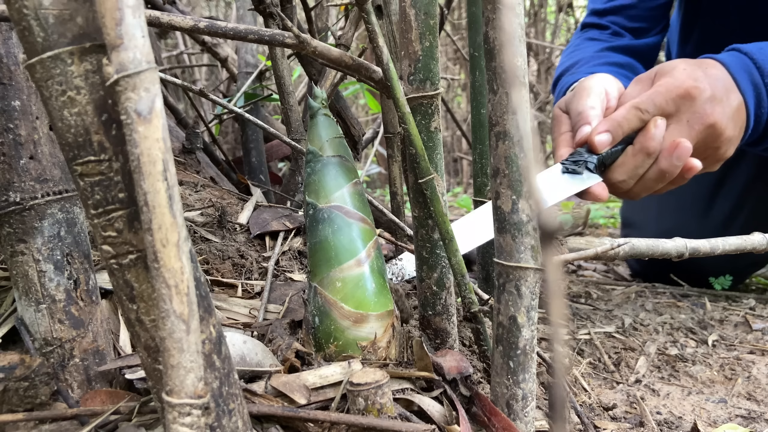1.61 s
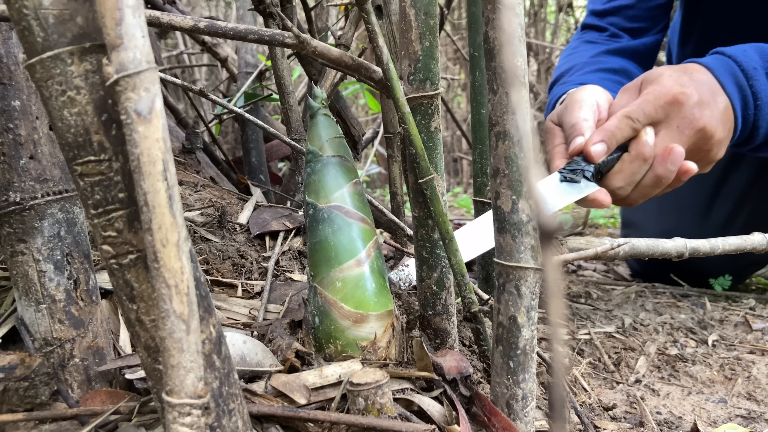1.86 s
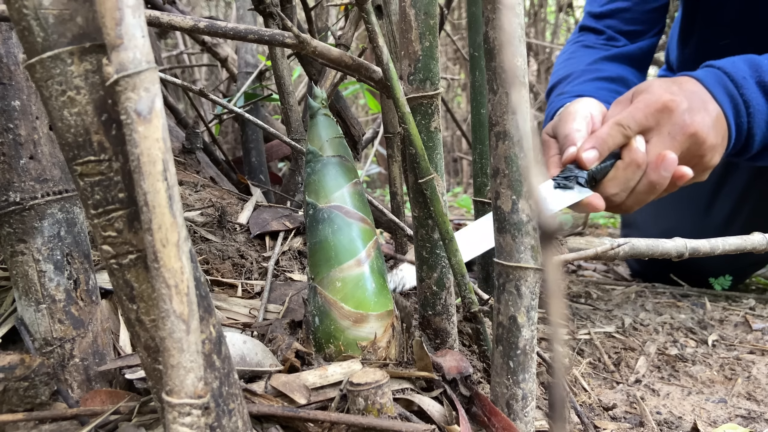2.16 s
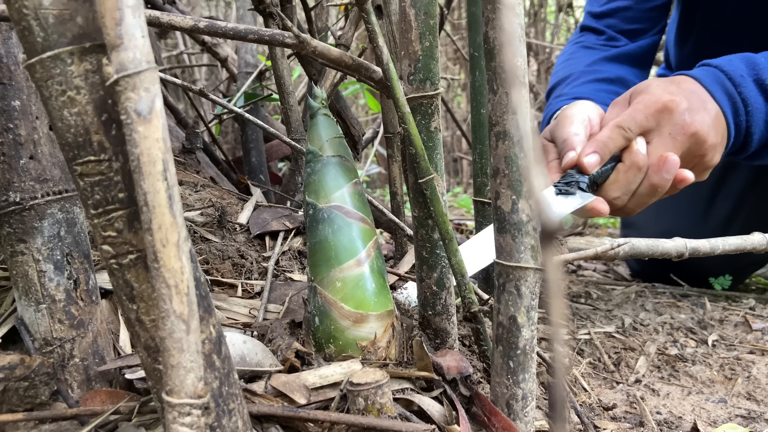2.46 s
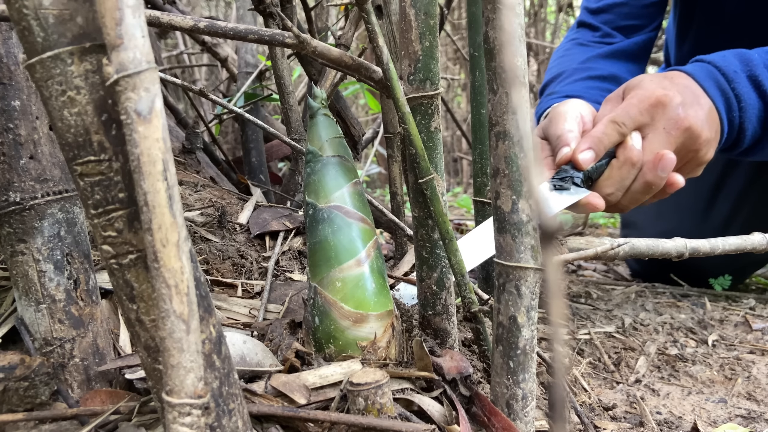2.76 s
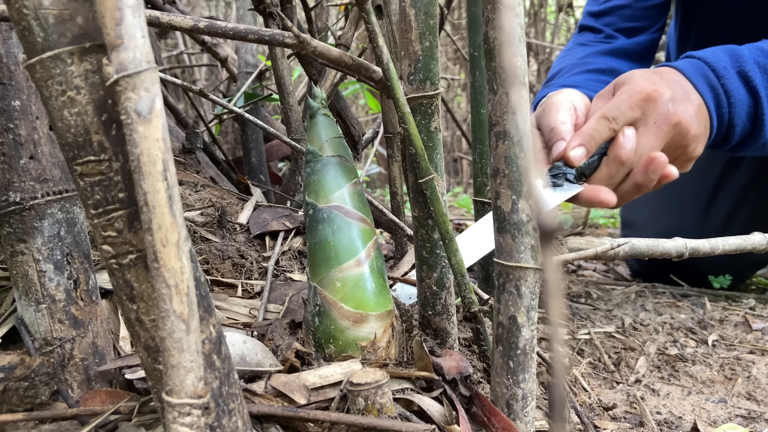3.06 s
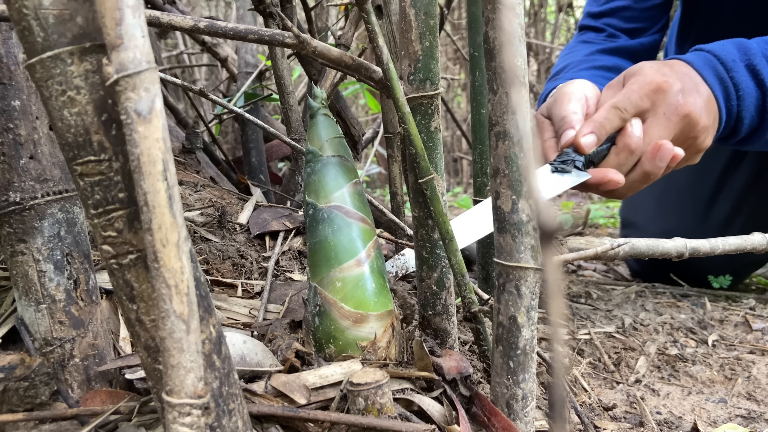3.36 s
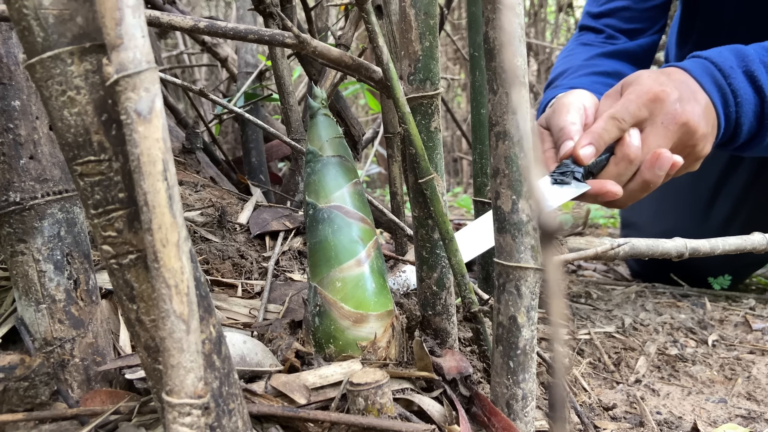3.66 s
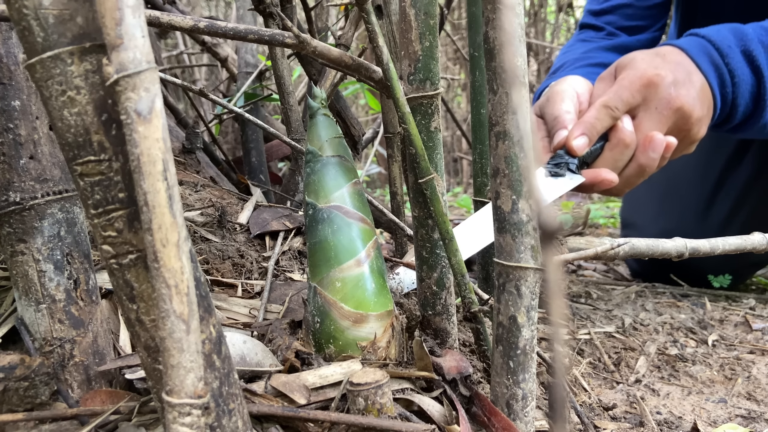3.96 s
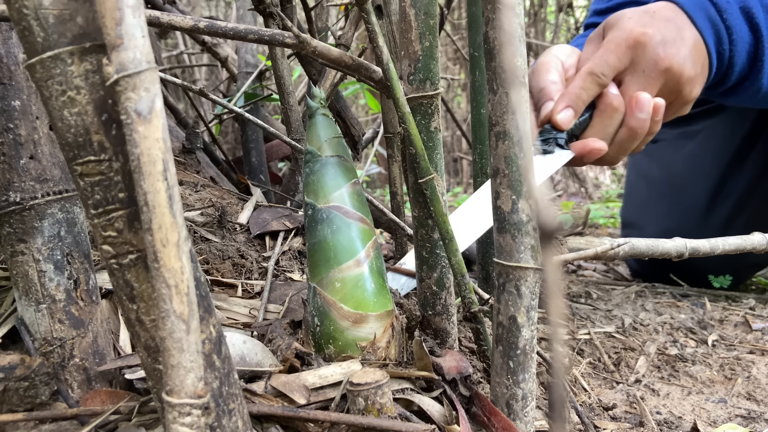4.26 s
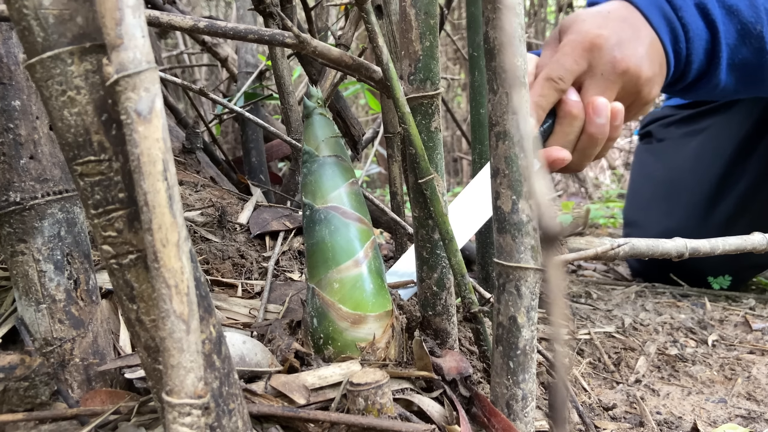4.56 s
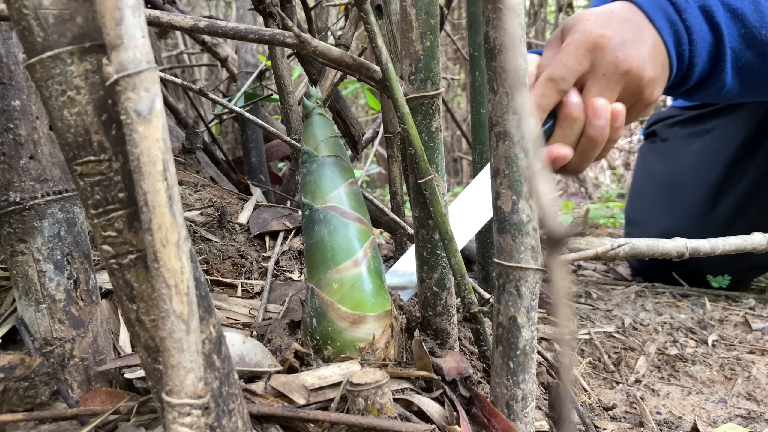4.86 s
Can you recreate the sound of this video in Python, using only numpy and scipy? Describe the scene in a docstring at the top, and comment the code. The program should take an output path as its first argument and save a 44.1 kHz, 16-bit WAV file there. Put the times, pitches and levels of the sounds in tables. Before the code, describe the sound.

A knife scrapes and cuts into a bamboo shoot, with wet crunching tears, sharp snaps and hollow knocks, close up outdoors.

```python
"""A long knife works into the foot of a bamboo shoot, close to the microphone.
Wet fibres tear in crunching bursts and snap singly; the blade rubs and grates along the sheaths.
The shoot and the dry stems round it knock and thump, and the stems scatter and echo the sound.
Behind lies the low rumble of a grove with a far bird."""
import sys
import numpy as np
from scipy import signal
from scipy.fft import rfft, irfft
from scipy.io import wavfile
from scipy.ndimage import uniform_filter1d

SR = 44100
rng = np.random.default_rng(int(sys.argv[2]) if len(sys.argv) > 2 else 0)


def generate_wav(signal):
    """Clip the signal to [-1, 1] and save it as 16-bit WAV at the path in sys.argv[1]."""
    frames = np.transpose(np.atleast_2d(signal))
    scaled = np.clip(frames, -1, 1) * 32767
    pcm = np.round(scaled).astype(np.int16)
    wavfile.write(sys.argv[1], SR, pcm)


N = 424241
TIME_S, BINS_HZ = np.arange(N) / SR, np.fft.rfftfreq(N, 1 / SR)
BITE_S, LET_GO_S, SINK_S = 0.0031, 0.007, 0.06  # the edge bites, lets go, sinks deep

# Levels and gains in all tables are relative.
# Pulls through the fibres. Each row: start and length in seconds, then final level, build-up,
# shake of the shoot and dry sheath ring in dB.
FIBRE_TEARS = [(3.848, 0.086, -42, -13, -6.5, -23), (4.105, 0.11, -28.5, -1.5, -9, -27),
               (4.227, 0.088, -15.5, 8.5, -11.5, -18), (4.325, 0.2, -16, 13, -11, -35.5),
               (4.873, 0.021, -15.5, 4, -12.5, -26), (6.867, 0.059, -35, 3, -1, 21.5),
               (6.971, 0.024, -37.5, 4.5, -4.5, 18.5), (7.022, 0.027, -31, 7, -5.5, 12),
               (7.28, 0.029, -24, 11, -6.5, 16.5), (7.356, 0.032, -30.5, -7.5, -7.5, 14),
               (7.386, 0.12, -15, 3.5, -11, 4), (7.843, 0.034, -11.5, 18.5, -15, -37),
               (8.224, 0.02, -27.5, 4, -17, -8), (8.588, 0.029, -20.5, -4, -14, 3),
               (9.108, 0.0065, -24, 12, -22, 18)]
# Single fibres and twigs breaking. Each row: time in seconds, level in dB.
FIBRE_SNAPS = [(0.016, -21), (0.7914, -36), (1.157, -39), (1.677, -29.5), (1.9962, -28), (2.27, -35.5),
               (2.3312, -32), (2.7087, -35), (2.94, -30), (3.203, -33.5), (3.834, -23.5), (3.861, -20),
               (3.9648, -28.5), (3.978, -25.5), (4.092, -24.5), (4.1494, -14), (4.38, -17), (4.4037, -21),
               (4.5147, -25), (5.065, -33), (5.2324, -25), (5.4578, -25), (7.248, -35.5), (7.2676, -25.5),
               (8.1026, -34.5), (8.2379, -12), (8.352, -30), (8.379, -27.5), (8.55, -25), (8.6003, -22.5),
               (8.9872, -35.5)]
# Blade sliding on sheaths and litter. Each row: hardest push, swell and fade in seconds, level in dB.
BLADE_SLIDES = [(0.01, 0.077, 0.18, -34.5), (0.38, 0.21, 0.11, -36.5), (0.8, 0.26, 0.28, -42),
                (1.59, 0.067, 0.094, -30.5), (1.83, 0.19, 0.072, -41), (2.03, 0.14, 0.087, -37),
                (2.271, 0.04, 0.044, -37.5), (2.34, 0.032, 0.1, -35), (2.715, 0.03, 0.097, -37.5),
                (3.011, 0.032, 0.04, -33.5), (3.165, 0.04, 0.13, -37.5), (3.568, 0.015, 0.05, -38.5),
                (5.41, 0.044, 0.086, -22.5), (5.62, 0.51, 0.23, -41.5), (6.035, 0.064, 0.39, -41.5),
                (6.573, 0.071, 0.05, -36), (8.63, 0.096, 0.098, -27.5), (9.14, 0.35, 0.4, -42.5),
                (9.27, 0.074, 0.13, -28), (9.604, 0.044, .1, -34.5)]
# Steady sleeve rustle. Each row: time in seconds, level in dB.
SLEEVE_RUSTLE = [(0, -52.5), (3.7, -61), (4.1, -44.5), (5.3, -47.5), (6.45, -55.5), (6.7, -49), (8.4, -48),
                 (9.6, -53)]
# Blade scraping a hollow stem. Each row: hardest push and swell in seconds, level in dB.
STEM_SCRAPES = [(1.839, 0.28, -43), (1.96, 0.066, -41.5), (3.18, 0.08, -43.5)]
# Stick-slip chirps, catches of the tip, taps on a dry cane. Each row: time in seconds, level in dB.
STEM_CHIRPS = [(1.57, -34.5), (1.721, -33), (1.969, -30), (1.986, -33), (2.011, -19.5)]
TIP_PINGS = [(8.552, -13), (9.114, -19.5)]
CANE_TAPS = [(5.8225, -21), (5.8838, -29)]
# Knocks on shoot and stems. Each row: time in seconds, wood pitch in Hz, then ground thump, wood,
# clack and crack in dB.
WOOD_KNOCKS = [(0.0514, 426, -35, -14.5, -18, -24.5), (0.112, 389, -30, -23, -30, -36),
               (0.398, 398, -19, -16, -13, -21.5), (3.016, 350, -33, -32.5, -49, -43.5),
               (3.454, 430, -50, -48, -35.5, -42.5), (5.3924, 287, -15, -30.5, -29, -31.5),
               (5.507, 407, -39, -27.5, -27, -38), (5.8221, 254, -35, -30, -24, -45),
               (5.8834, 278, -36, -23.5, -22, -40), (7.306, 305, -57, -21, -55, -28),
               (8.238, 317, -38, -24, -56, -57), (8.3, 540, -44, -40, -38, -47),
               (8.714, 473, -66, -32, -35.5, -60), (8.766, 386, -61, -25.5, -57, -59),
               (8.901, 440, -52, -50, -33.5, -52), (9.2307, 296, -17.5, -22, -18.5, -23),
               (9.593, 274, -23, -31.5, -66, -42.5)]
# Resonances of shoot, dry sheath, hollow stem, cane, blade and tip.
# Each row: frequency and width in Hz, gain in dB.
SHOOT_MODES = [(127.4, 22.2, 9), (316, 65, 5.5), (398, 26, 5), (580, 180, -5)]
HUSK_MODES = [(4730, 1400, -5.5)]
STEM_MODES = [(1210, 110, 22.4), (2010, 200, 15)]
CANE_MODES = [(1530, 38, -2), (1930, 190, 1.5), (2680, 39, 4), (3600, 150, 7)]
BLADE_MODES = [(6290, 150, -4.5), (6950, 120, -5)]
TIP_MODES = [(7480, 200, -2), (6370, 250, -8)]
# Spectra of breaking fibre, rubbing and the grove. Each row: frequency in Hz, density in dB.
FIBRE_SPECTRUM = [(800, 4.5), (1250, 8), (1850, 3), (2300, 1), (3300, 6.5), (4600, 6), (9000, 5),
                  (11300, 7.5), (15500, -3)]
RUB_SPECTRUM = [(1100, 2.5), (1750, 3), (3000, 4.5), (4500, 3.5), (9200, -2), (11000, 1.5), (15000, -11)]
GROVE_SPECTRUM = [(20, -22.5), (68, 3), (120, -3), (200, -10.5), (450, -20.5), (650, -15), (1000, -35.5),
                  (4600, -39), (5400, -35), (6300, -48), (11500, -89)]
# Direct sound at the two microphone ports. Each row: frequency in Hz, power share from 0 to 1.
DIRECT_SHARE = [(150, 0), (1200, 0.26), (3000, 0), (8000, 0.22), (11000, 0.67), (15000, 0.1)]
# Echo decay of the grove. Each row: frequency in Hz, T60 in seconds.
GROVE_T60 = [(200, 0.038), (4000, 0.11), (14000, 0.079)]
# Far bird's whistles. Each row: start in seconds, first and last pitch in Hz.
BIRD_WHISTLES = [(0.931, 2680, 2430), (1.24, 2280, 2480)]


def tearing(steady_db=4, wet_db=-3, body_db=18, recoil_db=-11, judder_hz=122, judder_db=-11):
    """Fibre bundles break in jerks that ring the sheath and shake the shoot. Returns crisp, low."""
    force, shake, husk, depth, recoil = np.zeros((5, N))
    release = np.hanning(int(LET_GO_S * SR) + 2)
    for start_s, length_s, db, build_db, shake_db, husk_db in FIBRE_TEARS:
        gain = pull(start_s, length_s, db, build_db)
        force += gain
        shake += gain * amp(shake_db)
        husk += gain * amp(husk_db)
        depth += gain * np.clip((TIME_S - start_s) / SINK_S, 0, 1) ** 2
        add(recoil, start_s + length_s, amp(db + shake_db + recoil_db) * release)
    jerks = bundles(per_s=135, uneven_db=6, decay_s=0.0015)
    fibres = grains(per_s=4500, spread_db=5, even_s=0.003) + amp(wet_db) * rng.standard_normal(N)
    steady = amp(steady_db) * force / force.max()  # breaks run together under more force
    breaks = (jerks + steady) / np.sqrt(1 + steady + steady ** 2) * unit_rms(fibres)
    crisp = colour(breaks * force, FIBRE_SPECTRUM, low_hz=470) + ring(breaks * husk, HUSK_MODES)
    pitch_hz = judder_hz * (1 + 0.12 * drift(cutoff_hz=30))
    judder = amp(judder_db) * depth * np.sin(2 * np.pi * np.cumsum(pitch_hz) / SR)
    return crisp, amp(body_db) * ring(breaks * shake + recoil, SHOOT_MODES) + judder


def pull(start_s, length_s, db, build_db):
    """Gain of one tear: the edge bites, the force ramps, the fibres let go."""
    remaining = np.clip((start_s + length_s - TIME_S) / length_s, 0, 1)
    before = np.maximum(start_s - TIME_S, 0) / BITE_S
    after = np.maximum(TIME_S - start_s - length_s, 0) / LET_GO_S
    return amp(db - build_db * remaining) * np.exp(-np.minimum(before + after, 20))


def bundles(per_s, uneven_db, decay_s):
    """Strain lets go in sharp jerks of uneven size and spacing."""
    spacing, size = rng.random((int(per_s * N / SR * 2), 2)).T
    at = (np.cumsum(0.5 + spacing) * SR / per_s).astype(int)
    jerks = np.zeros(N)
    jerks[at[at < N]] = amp(uneven_db * size[at < N])
    return unit_rms(signal.lfilter([1], [1, -np.exp(-1 / (decay_s * SR))], jerks))


def snapping(settle_db=-39, settle_s=0.047, body_db=-3, ticks_per_s=2, tick_db=-39, tick_spread_db=4):
    """Fibres click and splinter, two neighbours follow faintly; litter ticks. Returns crisp, low."""
    ticks = click(tick_db + tick_spread_db * rng.standard_normal(N))
    cracks = ticks * (rng.random(N) < ticks_per_s / SR)
    for at_s, db in FIBRE_SNAPS:
        add(cracks, at_s, click(db))
        add(cracks, at_s, amp(db) * fracture(decay_s=0.0013))
        for delay_s in settle_s * rng.random(2):
            add(cracks, at_s + delay_s, click(settle_db))
    crisp = amp(-3.5) * colour(cracks, FIBRE_SPECTRUM, low_hz=895)
    return crisp, amp(body_db) * ring(cracks, SHOOT_MODES)


def fracture(decay_s):
    """A break gives a short puff of noise."""
    t = TIME_S[:SR // 10]
    return fixed_energy(rng.standard_normal(len(t)) * np.exp(-t / decay_s))


def rubbing(grit_db=-1):
    """Blade and sleeve slide with a fine hiss, grit caught in the contact."""
    sleeve = amp(np.interp(TIME_S, *np.transpose(SLEEVE_RUSTLE)))
    force = np.sqrt(sleeve ** 2 + sum(stroke(*row) ** 2 for row in BLADE_SLIDES))
    contact = rng.standard_normal(N) + amp(grit_db) * grains(per_s=660, spread_db=3.5, even_s=0.023)
    hiss = unit_rms(contact * amp(drift(cutoff_hz=70)))
    return amp(-4) * colour(hiss * force, RUB_SPECTRUM, low_hz=700)


def stroke(peak_s, swell_s, fade_s, db, depth_db=-26.5, roundness=1.75):
    """Gain of one slide: it swells to the hardest push and fades."""
    away = np.maximum((peak_s - TIME_S) / swell_s, (TIME_S - peak_s) / fade_s)
    gain = np.zeros(N)
    gain[away < 2] = amp(db + depth_db * away[away < 2] ** roundness)
    return gain


def grating(chirp_s=0.0015, fade_ratio=0.29):
    """The blade chatters on a hollow stem; stick-slip chirps sound near its lowest mode."""
    force = sum(stroke(at_s, swell_s, fade_ratio * swell_s, db) for at_s, swell_s, db in STEM_SCRAPES)
    slips = force * unit_rms(ring(grains(per_s=180, spread_db=0, even_s=0.0097), STEM_MODES))
    t = TIME_S[:SR // 20]
    for at_s, db in STEM_CHIRPS:
        pitch_hz = STEM_MODES[0][0] * (1 + 0.025 * rng.standard_normal())
        add(slips, at_s, amp(db) * tone_pulse(t, pitch_hz, chirp_s))
    return slips


def knocking(thump_s=0.0067, wood_s=0.0023, glide_s=0.00059, hollow_db=-24.5, hollow_s=0.033):
    """Crack and clack, a bending wave with a hollow ring, then a ground thump. Returns crisp, low."""
    t = TIME_S[:SR // 5]
    low, clack, crack = np.zeros((3, N))
    wood_envelope = t / wood_s * np.exp(-t / wood_s) + amp(hollow_db) * np.exp(-t / hollow_s)
    for at_s, hz, thump_db, wood_db, clack_db, crack_db in WOOD_KNOCKS:
        bending_hz = hz * (1 + 3 * np.exp(-t / glide_s))  # treble arrives first
        wood = fixed_energy(wood_envelope * np.sin(2 * np.pi * np.cumsum(bending_hz) / SR))
        noise = rng.standard_normal(len(t)) * t * np.exp(-t / 0.0099)
        rattle = amp(-9) * fixed_energy(ring(noise, [(hz, 90, 0), (0.5 * hz, 140, 0)]))
        thump_hz = 113 * np.sqrt(hz / SHOOT_MODES[1][0])
        thump = tone_pulse(t, thump_hz, thump_s)
        add(low, at_s, amp(wood_db) * (wood + rattle) + amp(thump_db) * thump)
        add(clack, at_s, click(clack_db))
        add(crack, at_s, amp(crack_db) * fracture(decay_s=0.0021))
    clack = colour(clack, [(1800, 21.5), (2800, 5.5), (6000, -18)], low_hz=780)
    crack = colour(crack, [(4200, 13), (15000, -5.5)], low_hz=2980)
    return clack + amp(5.5) * crack, low


def tapping(hits, modes):
    """Light contacts briefly ring the blade's tip or a dry cane."""
    out = np.zeros(N)
    response = fixed_energy(ring(signal.unit_impulse(SR // 10), modes))
    for at_s, db in hits:
        add(out, at_s, amp(db) * response)
    return out


def among_stems(x, scatter_s=0.0015, paths=6, left_lag_s=0.000272):
    """Direct treble reaches the right port first; stems and ground scatter the rest on shifting paths."""
    lag_s = np.array([[left_lag_s], [0]]) * BINS_HZ ** 4 / (BINS_HZ ** 4 + 2500 ** 4)
    t, spectrum = TIME_S[:SR // 20], rfft(x)
    direct = np.clip(log_interp(DIRECT_SHARE, BINS_HZ), 0, 1)
    out = irfft(spectrum * np.sqrt(direct) * np.exp(-2j * np.pi * BINS_HZ * lag_s), N)
    scattered = irfft(spectrum * np.sqrt(1 - direct), N)
    shares = np.array([drift(cutoff_hz=14.1) for _ in range(paths)])
    for share in shares / np.linalg.norm(shares, axis=0):
        taps = rng.standard_normal((2, len(t))) * np.sqrt(t) * np.exp(-t / scatter_s)
        taps /= np.linalg.norm(taps, axis=1, keepdims=True)
        out += signal.oaconvolve((share * scattered)[None], taps, axes=1)[:, :N]
    return out


def echoes(x):
    """Farther stems return a short diffuse tail."""
    hz, t, noise = signal.stft(rng.standard_normal((2, SR // 2)), SR, nperseg=256)
    decay = amp(-60 * t / log_interp(GROVE_T60, hz)[:, None])
    tail = signal.istft(noise * decay, SR, nperseg=256)[1]
    return signal.fftconvolve(x[None], tail / np.linalg.norm(tail[0]), axes=1)[:, :N]


def bird(length_s=0.19, level_db=-60, waver_hz=55):
    """Faint gliding whistles from deep in the grove."""
    song, count = np.zeros(N), int(length_s * SR)
    for at_s, first_hz, last_hz in BIRD_WHISTLES:
        pitch_hz = np.linspace(first_hz, last_hz, count) + waver_hz * drift(cutoff_hz=36)[:count]
        add(song, at_s, np.sin(2 * np.pi * np.cumsum(pitch_hz) / SR) * signal.windows.tukey(count, 0.5))
    return amp(level_db) * song


def grove(level_db=-37.5, waver_db=1.1):
    """Distant rumble and thin insect hiss; only the bass is alike in both ports."""
    shared, left, right = rfft(rng.standard_normal((3, N)))
    coherence = np.clip(log_interp([(100, 0.9), (700, 0.27), (2000, 0.011)], BINS_HZ), 0, 1)
    ports = np.sqrt(coherence) * shared + np.sqrt(1 - coherence) * np.array([left, right])
    rumble = unit_rms(irfft(ports * amp(log_interp(GROVE_SPECTRUM, BINS_HZ)), N))
    return amp(level_db + waver_db * drift(cutoff_hz=7)) * rumble


def amp(db):
    """Decibels to gain."""
    return 10 ** (np.asarray(db) / 20)


def unit_rms(x):
    """Scales to rms 1."""
    return x / np.sqrt(np.mean(x ** 2) + 1e-20)


def fixed_energy(x):
    """Scales to the energy of 5 ms at rms 1."""
    return x * np.sqrt(0.005 * SR / np.sum(x ** 2))


def click(db):
    """One-sample impulse."""
    return amp(db) * fixed_energy(np.ones(1))


def tone_pulse(t, hz, decay_s):
    """Sine that swells and dies away."""
    return fixed_energy(t ** 2 * np.exp(-t / decay_s) * np.sin(2 * np.pi * hz * t))


def grains(per_s, spread_db, even_s):
    """Random clicks, sizes spread, power levelled over even_s."""
    size = amp(spread_db * np.minimum(rng.exponential(1, N), 4)) * rng.choice([-1, 1], N)
    clicks = size * (rng.random(N) < per_s / SR)
    power = abs(uniform_filter1d(clicks ** 2, max(int(even_s * SR), 1)))
    return clicks / np.sqrt(power + 1e-3)


def drift(cutoff_hz):
    """Slow noise of rms 1."""
    lowpass = signal.butter(2, cutoff_hz, fs=SR, output="sos")
    return unit_rms(signal.sosfilt(lowpass, rng.standard_normal(N + SR))[SR:])


def log_interp(points, hz):
    """Reads a table on a log-frequency axis."""
    points_hz, values = np.transpose(points)
    return np.interp(np.log(hz + 1), np.log(points_hz + 1), values)


def colour(x, points, low_hz):
    """Minimum-phase filter with a bass roll-off; keeps the power of white noise."""
    hz = abs(np.fft.fftfreq(4096, 1 / SR))
    log_gain = np.log(amp(log_interp(points, hz)) * hz ** 3 / (hz ** 3 + low_hz ** 3) + 1e-5)
    taps = np.fft.ifft(np.exp(np.conj(signal.hilbert(log_gain)))).real[:len(hz) // 2]
    return signal.oaconvolve(x, taps / np.linalg.norm(taps))[:N]


def ring(x, modes):
    """Sum of resonances, each with its own peak gain."""
    return sum(amp(db) * signal.lfilter(*signal.iirpeak(hz, hz / width_hz, SR), x)
               for hz, width_hz, db in modes)


def add(mix, at_s, sound):
    """Adds a sound to the mix in place."""
    part = mix[max(round(at_s * SR), 0):][:len(sound)]
    part += sound[:len(part)]


def scene():
    """Contacts and breaks ring the blade; crisp sounds scatter, low ones a little; both echo."""
    tears, tears_low = tearing()
    snaps, snaps_low = snapping()
    knocks, knocks_low = knocking()
    contact, breaks = rubbing() + knocks, tears + snaps
    blade = amp(4.5) * ring(contact + 0.5 * breaks, BLADE_MODES)
    taps = tapping(TIP_PINGS, TIP_MODES) + tapping(CANE_TAPS, CANE_MODES)
    crisp = breaks + contact + grating() + taps + blade
    low = tears_low + snaps_low + knocks_low
    near = among_stems(crisp + 0.22 * low) + 1.36 * low
    return near + echoes(amp(-9) * crisp + amp(1) * low + bird()) + grove()


def record(dry):
    """Clips the sharpest peaks, then low-passes at 16 kHz."""
    lowpass = signal.firwin(401, 16000, window=("kaiser", 8), fs=SR)
    return signal.oaconvolve(np.clip(dry, -0.95, 0.95), lowpass[None], "same")


dry = scene()
out = record(dry)
generate_wav(out)
```